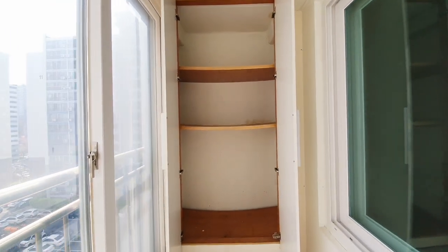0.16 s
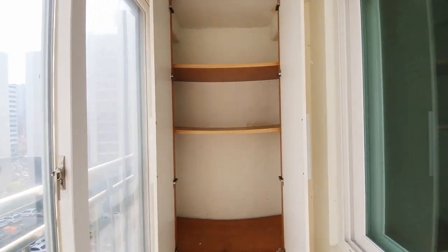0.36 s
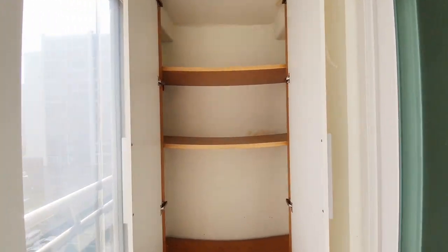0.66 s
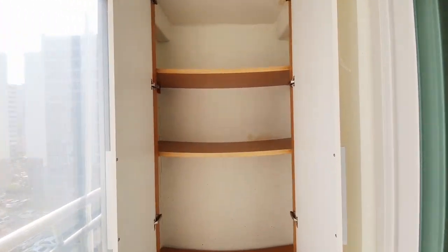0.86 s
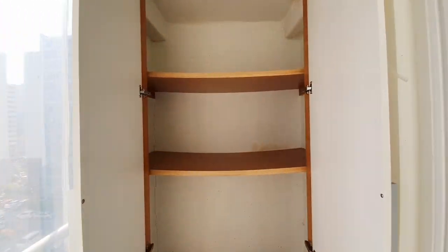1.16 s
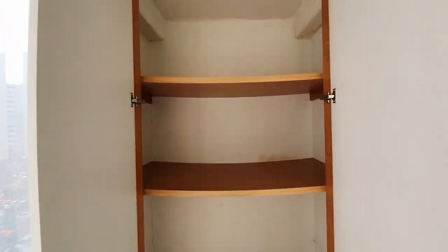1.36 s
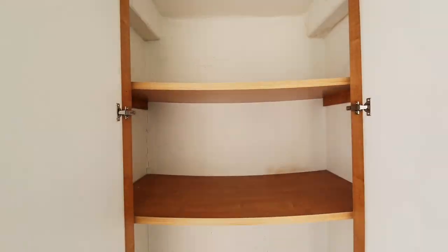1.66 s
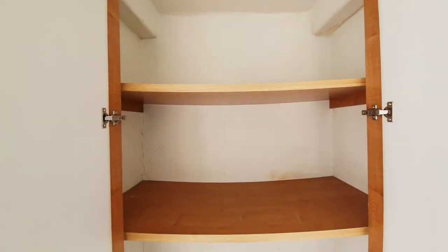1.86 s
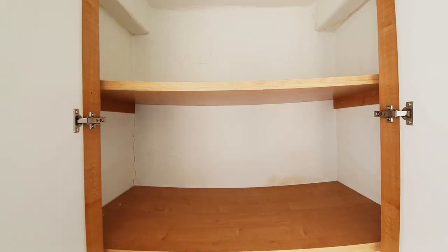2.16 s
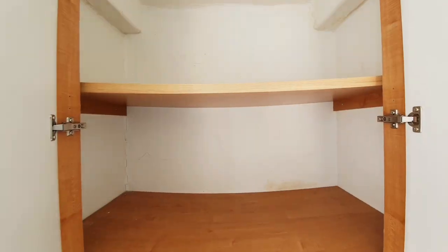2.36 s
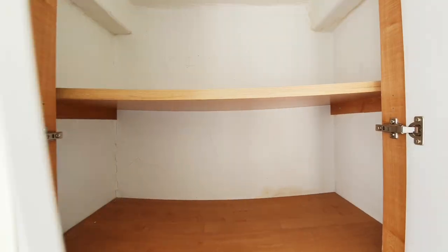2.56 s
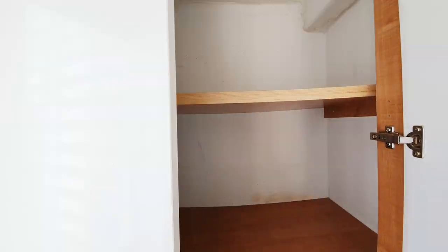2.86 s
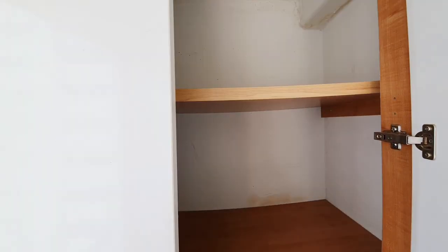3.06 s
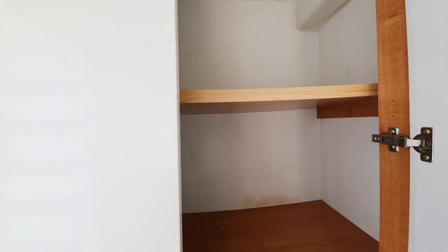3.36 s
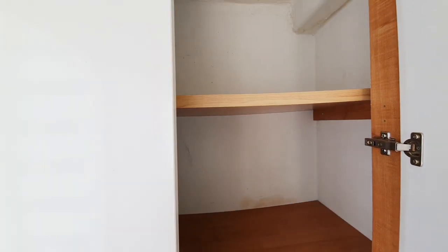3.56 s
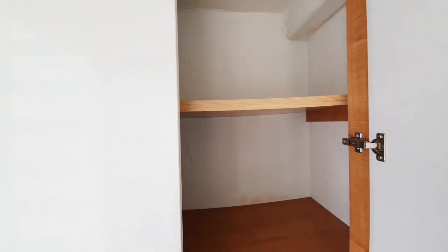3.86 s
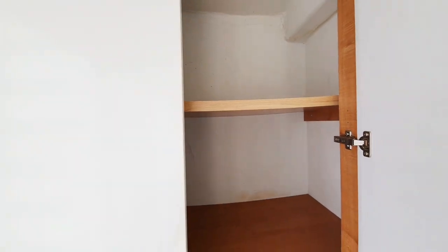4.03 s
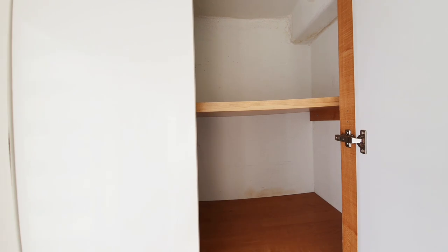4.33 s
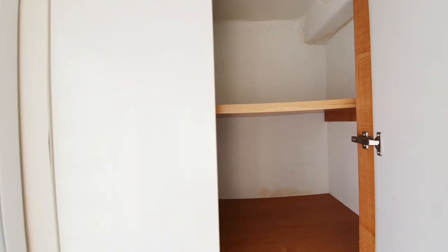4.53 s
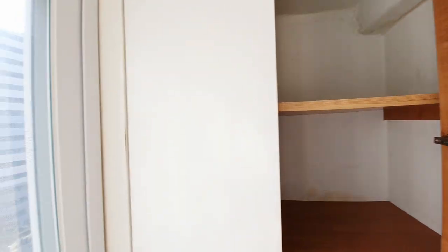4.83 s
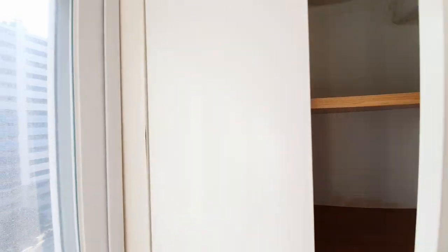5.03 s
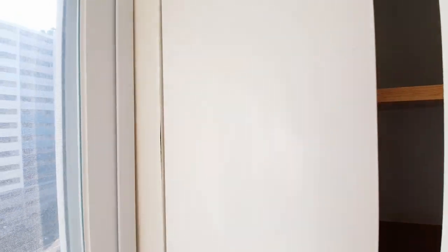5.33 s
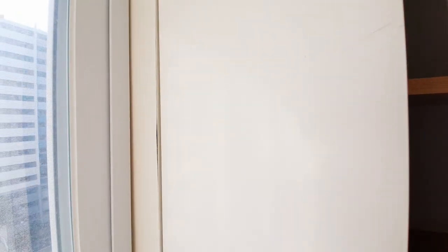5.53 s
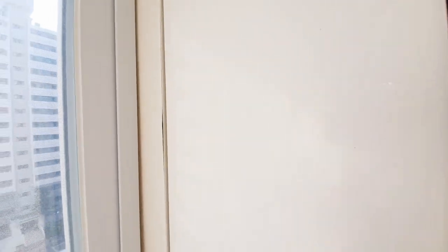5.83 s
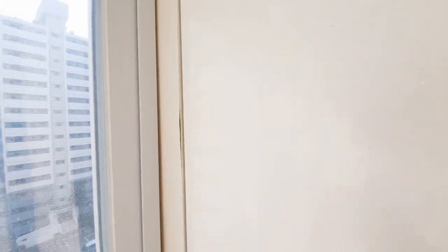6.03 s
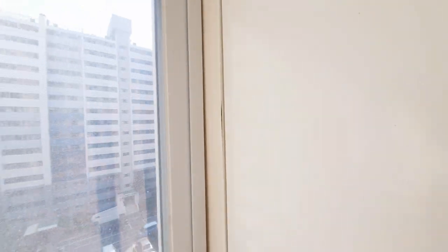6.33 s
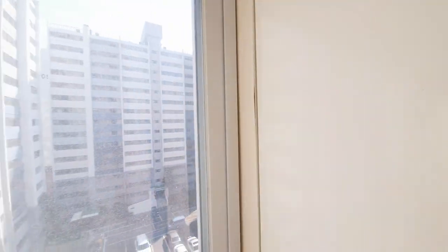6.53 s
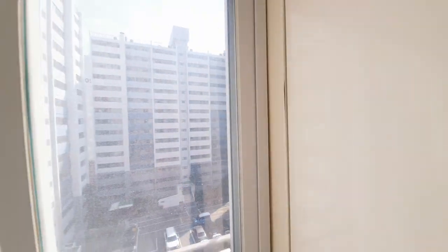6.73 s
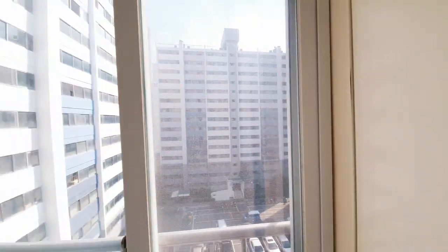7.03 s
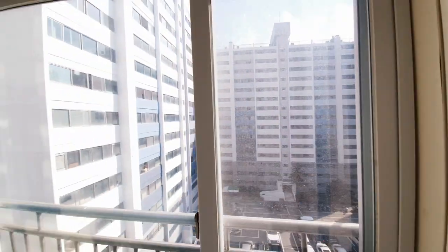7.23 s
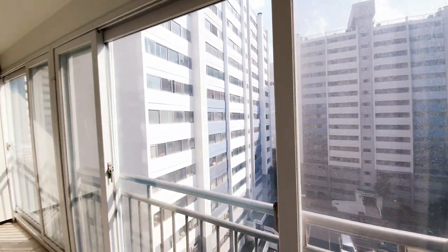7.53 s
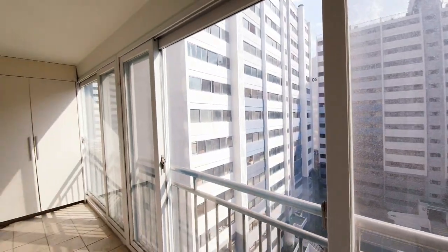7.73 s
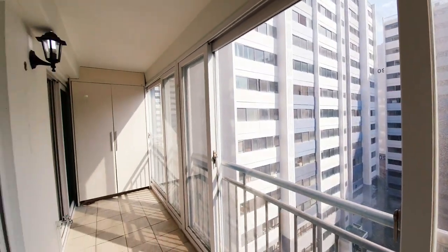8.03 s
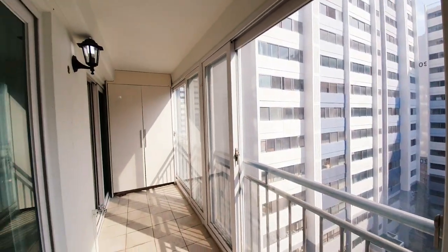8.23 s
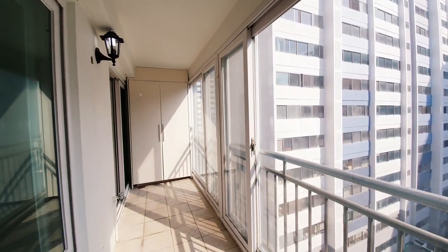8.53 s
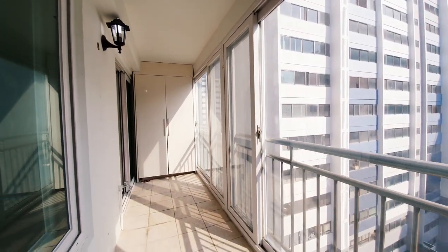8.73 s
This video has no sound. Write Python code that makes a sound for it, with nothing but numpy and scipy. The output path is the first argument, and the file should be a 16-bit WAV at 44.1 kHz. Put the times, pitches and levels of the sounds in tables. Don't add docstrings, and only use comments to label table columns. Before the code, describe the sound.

Close hollow thuds and hinge clicks of cupboard doors being closed in an empty echoing balcony, with soft fabric rustle and a faint city hum.

```python
import sys
import numpy as np
from scipy import signal
from scipy.fft import rfft, irfft, next_fast_len
from scipy.io import wavfile
from scipy.ndimage import map_coordinates

SR = 44100
rng = np.random.default_rng(int(sys.argv[2]) if len(sys.argv) > 2 else 0)


def output_pcm(signal):
    pcm = np.clip(np.atleast_2d(signal).T, -1, 1) * 32767
    wavfile.write(sys.argv[1], SR, np.round(pcm).astype(np.int16))


def linear_from_db(decibels):
    return 10 ** (np.asarray(decibels, float) / 20)


N = 392049

# t/s, peak level/dB, centre f/Hz, room share/dB
THUDS = [ (.212, -44.5, 165, -5), (2.66, -43.5, 75, -2), (2.93, -42, 70, -16), (3.232, -38, 95, -1),
         (3.278, -15.5, 118, -16), (3.028, -40, 58, -22), (3.333, -25, 160, -14), (3.418, -25, 130, -14),
         (5.128, -23.5, 130, -13), (5.165, -24.5, 140, -13), (8.275, -40, 60, -12),
         (3.903, -47.5, 258, -7.5), (4.033, -39, 200, -2), (5.055, -31, 145, 3), (5.737, -45, 280, -2),
         (6.105, -36, 260, 4), (6.640, -33.5, 192, -2.5), (7.93, -56, 100, 6), (8.086, -35, 140, -10),
         (8.130, -32, 140, -6), ]
PANEL_KNOCKS = [ (1.196, -35.5, 400, -8), (1.27, -44, 330, -1.5), (3.107, -47, 400, -2),
                (3.125, -48, 500, -6), (4.032, -49, 620, 0), (5.055, -38, 480, -1),
                (6.096, -32.5, 760, 2.5), (6.431, -43, 590, -9), (6.638, -39, 680, -6),
                (8.08, -51, 430, -8), (8.126, -45, 420, -4), (8.157, -44, 480, -12), (.47, -60, 520, -4), ]
SLAPS = [(2.642, -46, 520, -3.5), (3.015, -40, 520, -4), (3.262, -27, 380, -5), (5.62, -47, 600, -9)]
RAPS = [ (.862, -51, 1700, -1.5), (1.199, -56, 1000, 1.5), (2.181, -39, 2300, -8.5), (2.618, -64, 1050, 11),
        (3.021, -52, 700, 4), (3.263, -25.5, 1500, -13), (4.029, -52, 1450, -1.5), (5.054, -46, 1150, 2),
        (5.068, -43, 2200, -4), (6.094, -27, 1750, -13), (6.098, -39, 1220, 3.5), (6.155, -43, 1400, 0),
        (6.225, -48, 1250, 0), (3.275, -35, 1500, -9), (6.431, -53, 1180, -4), (6.637, -38.5, 1150, -10),
        (8.08, -57, 1700, -12), (8.089, -57, 1700, -13), (8.128, -58, 1600, -14), ]
HINGE_CLICKS = [ (.19, -59, 6350, -1.5), (.864, -51.5, 3800, -2), (2.182, -35, 3600, -11),
                (2.484, -53, 2300, -4), (2.641, -46, 4260, -14), (2.769, -43, 3600, -8),
                (3.022, -54, 5900, 1.5), (3.263, -40, 3600, -4), (3.3, -35.5, 5800, -14),
                (5.0545, -52, 4200, 1), (5.624, -49, 8000, 0.1), (6.0935, -38, 3300, -17),
                (8.1813, -55, 3800, -11), ]
STEEL_TICKS = [ (3.03, -51, 13400, -1.5), (3.2858, -26, 13800, -15), (3.2925, -32, 14200, -16),
               (3.3012, -27, 7800, -17), (3.472, -54, 12500, -5), (3.495, -56, 14000, -8), ]
SNAP = [(2.1813, -32, 3600, -30)]
CATCH = [(6.0942, -14.5, 1300, -24)]
# crack t60/s, room build-up/s, rise/cycles
WOOD = (.054, .0072, .61)
EDGE = (.03, .0035, 1.3)
STEEL = (.0094, .0055, 6.7)
# t/s, left lag/ms
BEARING = [(1.2, .13), (2.18, -.15), (3.12, .15), (3.26, .4), (3.295, .01), (3.31, .01), (4.03, .25),
           (5.06, .24), (5.7, .01), (6.1, -.39), (6.43, .2), (8.1, -.05)]

FIRST_CLOSING = [ ((.864, -66, .004), [(1250, -2, .35), (1720, 0, .25), (1900, -2, .3), (2650, -4, .25),
                 (3030, -1, .25), (3520, -5, .25)]), ((1.197, -45, 0.0035), [(182, -3, 0.4), (380, -11, 0.71),
                 (418, -9.5, .5), (470, -2, 0.35), (600, -4, 0.3)]), ((1.30, -48.5, 0.023), [(304, 2, 0.66)]),
                 ((2.182, -49, 0.0012), [(2020, 1, .2), (2490, -5, .2), (2730, -5, .3), (3165, -5, .3),
                 (3550, -4, .33), (3900, -2, .15), (5200, -6, .35), (5550, -6, .3)]), ((1.99, -51, .006),
                 [(212, 0, .35)]), ((2.121, -41, .004), [(210, 0, .4)]), ((2.2, -50, .015), [(215, 0, .3)]),
                 ((3.27, -43, .006), [(447, -4, .6), (560, 0, .46), (775, -4, .6), (894, -8, .55),
                 (1044, -5, .35), (1120, -3, .36), (1206, -6, .25), (1357, -8, .25)]), ((3.279, -24.5, 0.0041),
                 [(62.2, -12, 0.64), (107.6, .5, 0.8), (146.4, -2.5, 0.85), (195, -6, .6), (259.6, -6, .65),
                 (295, -8, .5), (362, -16.5, 0.69), (630, -20, 0.61)]), ((4.037, -33, 0.022), [(70, 1.5, 0.56),
                 (95, 1, 0.43), (138.8, -3, 0.7), (246, -13, 0.24), (334, -20, 0.4), (388, -14, .27),
                 (554, -14, .31), (624, -11, .22), (727, -26, .5)]), ((4.36, -37, 0.018), [(70, 4, 0.56),
                 (100, -4, .5), (144, -5, 0.6)]), ((4.715, -39, .008), [(47.6, 1, 0.42), (75, -5, .3)]), ]
SECOND_DOOR = [ ((5.058, -18, 0.048), [(63.5, -1, 0.87), (118.4, -1, 0.72), (221.4, -15, 1.0),
               (256.4, -9, 0.6), (414, -12.5, 0.28)]), ((6.100, -26.5, 0.041), [(59.4, -2, 0.76),
               (83.4, -1, 0.85), (142, -.5, 0.72), (196, -3, 0.55), (258.7, -12, 0.89), (300, -12, 0.72),
               (432, -13, 0.45), (680, -18, 0.8)]), ((6.097, -40, .006), [(678, -2, .4), (894, -4, .42),
               (1114, -3, .4), (1200, -6, .56), (1330, -8, .6), (1389, -9, .37), (1540, -7, .35),
               (1744, -8, .41), (1868, -6, .36), (1949, -5, .33), (2250, -8, .33), (2595, -13, .33)]),
               ((6.640, -36.5, 0.025), [(49.4, -6, 0.35), (88.8, -3, 0.41), (257, -1.5, 0.3),
               (354, -13, 0.8)]), ((8.082, -34, 0.039), [(44.5, 1, 0.74), (85.4, -6.5, 0.9),
               (141.1, 0.5, 0.55), (216, -14, 0.6), (297, -14, .5), (345, -12, 0.74)]), ((8.128, -40, .008),
               [(140, -4, .5), (221, 2, .4), (345, -3, .42), (479, -14, .6), (522, -16, .5),
               (565, -15, .55), (646, -18, .4)]), ]
FIRST_TOUCHES = [ ((3.105, -37, .003), [(280, 0, .08), (560, -8, .1)]), ((3.127, -36, .003), [(300, 0, .08),
                 (220, -3, .12), (850, -14, .15)]), ((3.262, -37, .003), [(640, -4, .15), (900, 0, .12),
                 (1300, -2, .12), (1720, -2, .13), (2050, 3, .07), (2400, -6, .15)]), ((4.029, -53, .003),
                 [(690, 0, .3), (1150, -4, .2), (1420, -1, .15), (1750, -6, .2), (2250, -9, .2)]),
                 ((6.0945, -31, .002), [(430, 0, .06), (700, 3, .12), (1200, -3, .08), (1850, 4, .06)]),
                 ((6.094, -31, .003), [(65, -3, .15), (110, -4, .2), (155, 2, .1), (215, 2, .08)]),
                 ((8.078, -38, .004), [(60, 0, .15), (105, -2, .12), (150, 0, .12)]), ((3.266, -34, .002),
                 [(2060, 0, .05), (215, 7, .15), (270, 5, .15)]), ((3.232, -37, .003), [(215, 0, .1),
                 (290, -5, .08)]), ((5.066, -47, .002), [(1950, 0, .1), (2350, 0, .12), (600, 4, .4)]),
                 ((5.62, -52, .01), [(105, 0, .5), (150, -3, .4)]), ]

# start t/s, end t/s, first f/Hz, level/dB
SQUEAKS = [ (.25, .42, 285, -66), (.6, .8, 290, -66), (.6, .95, 1270, -79), (2.62, 2.74, 225, -56),
           (3.7, 3.95, 1245, -78), (4.26, 4.3, 1750, -73), (4.33, 4.36, 1740, -73),
           (4.345, 4.38, 1150, -72), (4.4, 4.42, 1200, -71), (4.78, 5.02, 1760, -80), (6.5, 6.7, 2880, -77),
           (6.8, 6.86, 4080, -70), (6.95, 7.06, 4050, -78), (6.82, 6.98, 1720, -68),
           (4.17, 4.32, 3950, -74), (4.06, 4.12, 3950, -78), (8.5, 8.75, 1225, -76), ]
RASPS = [
    (1.9, 2.01, 1710, -69),
    (4.26, 4.36, 640, -63),
    (4.68, 4.78, 1930, -78),
]
# start t/s, end t/s, first f/Hz
SQUEAL = (6.4, 7.12, 575)
# multiple of the pitch, level/dB
SQUEAL_PARTIALS = [(2, -71), (3.22, -73), (4.3, -77), (5.1, -82), (8, -89)]

# peak t/s, rise/s, fall/s, level/dB
FINE = [(2.768, .012, .04, -66), (2.15, .06, .08, -67), (2.38, .04, .06, -76), (3.49, .02, .03, -72),
        (1.3, .1, .2, -84)]
SILKY = [(.3, 0.13, 1.5, -77.5), (1.52, .03, 0.05, -73), (1.945, 0.027, .072, -67.5),
         (2.215, .022, .08, -62.5), (3.3, 0.4, 0.83, -74.5), (2.55, .1, .2, -75), (4.07, 0.047, 0.061, -69),
         (5.3, 0.31, 0.17, -75.5), (5.92, 0.051, 0.041, -57.5)]
SMOOTH = [(2.785, .012, .05, -60.5), (3.65, .013, .12, -73), (4.26, .079, 0.15, -61),
          (5.664, .031, 0.076, -51), (6.0, 0.072, 0.067, -51), (8.749, .073, 0.092, -53.5)]
PLAIN = [(.6, 0.19, 0.18, -72.5), (1.4, 0.2, 0.12, -70.5), (3.045, .02, 0.055, -60.5),
         (4.44, .063, 0.046, -63), (6.34, 0.068, .12, -58.5), (6.84, .079, .11, -58.5),
         (6.99, .088, .083, -59.5), (8.37, .077, .11, -52.5)]
COARSE = [(2.39, .04, 0.09, -73), (2.64, 0.04, .13, -66.5), (2.97, .03, .04, -73), (3.13, .05, .06, -76),
          (2.23, .05, .07, -70), (3.25, .025, .02, -66), (2.92, .05, .04, -78), (4.8, .16, 0.31, -83),
          (6.6, 0.19, .17, -75), (7.15, 0.12, 0.13, -79), (8.6, 0.13, 0.11, -76.5)]
# fine weave level/dB, coarse scuff level/dB
BLEND = [
    (6, -12),
    (-1.5, -0.5),
    (-7.5, -6),
    (-6.5, 0.4),
    (-6.5, 8.5),
]
# f/Hz, level per Hz/dB
CLOTH = [(1290, -24), (2200, -7.5), (2490, -7.5), (3170, -1.5), (6300, -3.5), (8020, -2.5), (9470, -15.5),
         (11500, -18.5), (15000, -44), (22000, -120)]
WEAVE = [(6180, -21), (10500, -0.5), (12600, 5), (15100, 3.5), (16000, -23.5)]
SCUFF = [(350, -37), (600, -8.5), (901, -6), (1320, -6), (1970, -6), (3200, -15.5), (4160, -20),
         (7040, -120)]
AIR = [(8.8, -30), (18, -2), (30, 6), (70, -4), (91, -25.5), (150, -120)]
FLOORBOARD = [(26, -34), (45, -7), (103, 0), (141, -8.5), (190, -30), (250, -48), (420, -120)]
FRAME = [(82, -38.5), (140, -1), (167, -1.5), (241, -5.5), (280, 2.5), (322, -9), (900, -18), (1170, -63),
         (1980, -120)]
HUM = [(12, -30), (25, 5), (36, -2), (193, -18.5), (248, -14), (328, -18.5), (377, -14.5), (1000, -25),
       (1330, -25.5), (1700, -26), (7950, -41), (9140, -52.5), (14700, -35.5), (16000, -41)]

# t/s, effort level/dB
EFFORT = [(0, -69.5), (.6, -66.5), (1.15, -69), (1.7, -76), (2.05, -62), (2.5, -66.5), (2.9, -64.5),
          (3.21, -55.5), (3.55, -62), (4.9, -68), (5.65, -65.5), (5.95, -69), (7.2, -65.5), (7.7, -68),
          (8.03, -64), (8.89, -68)]
# t/s, air level/dB, footfall level/dB, creak level/dB
SHUDDERS = [(1.3, -66, -68, -60), (3.28, -41.5, -45, -51.5), (4.07, -45.5, -47, -61), (4.4, -55, -48, -61),
            (5.09, -38.5, -43, -51), (5.45, -72, -55, -66), (6.12, -41.5, -40.5, -42.5),
            (6.64, -46, -53, -64), (8.07, -40.5, -52, -61), (8.46, -68, -72, -63)]
# t/s, level/dB, left-right level/dB
PUFFS = [(1.13, -61, -2), (1.6, -52, .1), (2.69, -54, -12), (3.04, -52, -20.5), (3.21, -53, 8),
         (3.8, -53.5, 10), (4.8, -49, -16), (6.08, -54, -3), (7.7, -59.5, -.6), (7.95, -57, 1.2)]

# f/Hz, t60/s
ROOM = [(60, 0.84), (250, 0.61), (600, 0.5), (1500, 0.39), (4000, 0.31), (12000, 0.21)]
# f/Hz, left-right correlation
ALIKE = [(60, 0.87), (150, 0.82), (380, 0.74), (950, -0.13), (2380, 0.029), (15000, 0.029)]
# f/Hz, level/dB
MICROPHONE = [(6500, 0), (8000, .7), (9000, -1.5), (11300, -1.2), (12300, 0)]


def unit(x):
    return x / np.sqrt(np.mean(x ** 2) + 1e-20)


def along(points, hz):
    f, v = np.transpose(points)
    return np.interp(np.log(hz + 1), np.log(f + 1), v)


def wobble(rate, size=N):
    knots = rng.standard_normal(int(size * rate / SR) + 4)
    return map_coordinates(knots, [np.arange(size) * rate / SR])


def filtered(x, response):
    m = next_fast_len(x.shape[-1] + 4096)
    return irfft(rfft(x, m) * response(np.fft.rfftfreq(m, 1 / SR)), m)[..., :x.shape[-1]]


def diffuse(pair, gain):
    peaks_db = 2.5 * rng.standard_normal(SR // 80 + 1)

    def response(hz):
        turn = np.arccos(np.clip(along(ALIKE, hz), -1, 1)) / 2
        ripple_db = np.interp(hz / 40, np.arange(len(peaks_db)), peaks_db)
        ripple = linear_from_db(ripple_db * np.clip(hz / 600 - .4, 0, 1))
        return gain(hz) * ripple * [np.cos(turn), np.sin(turn)]

    mid, side = filtered(pair, response)
    return np.array([mid + side, mid - side])


def rush(spectrum, grain_db, grain_rate):
    grains = linear_from_db(grain_db * np.array([wobble(grain_rate), wobble(grain_rate)]))
    noise = grains * rng.standard_normal((2, N))
    return unit(diffuse(noise, lambda hz: linear_from_db(along(spectrum, hz))))


def add(out, sound, s):
    part = out[:, round(s * SR):][:, :sound.shape[-1]]
    part += sound[..., :part.shape[1]]


def blow(s, centre_hz, room_db, size, octaves, crack_t60, build, rise_cycles):
    t = np.arange(size) / SR
    noise = rng.standard_normal((3, size))
    lag_ms = np.interp(s, *np.transpose(BEARING))

    def colour(hz):
        skirt = np.where(hz > centre_hz, .85, 1)
        return 1 / (1 + (np.log2((hz + 1) / centre_hz) / (max(octaves, .1) * skirt)) ** 4)

    def lag(hz):
        return np.exp(-1j * np.pi * hz * lag_ms * [[1e-3], [-1e-3]])

    attack = np.minimum(t * centre_hz / rise_cycles, 1)
    source = unit(filtered(noise[0], colour)) * linear_from_db(-60 * t / crack_t60) * attack
    crack = filtered(np.pad(1.3 * source / np.abs(source).max(), (64, 0)), lag)[:, 64:]

    clumps = linear_from_db(2.2 * np.interp(t * 45, np.arange(30), noise[0, -30:]))
    hz, when, z = signal.stft(unit(diffuse(clumps * noise[1:], colour)), SR, nperseg=512)
    decay = linear_from_db(-60 * when / along(ROOM, hz)[:, None])
    tail = signal.istft(z * decay, SR, nperseg=512)[1][:, :size]
    near_walls = .93 + .45 * np.exp(-t / .04)
    return crack + linear_from_db(room_db) * tail * near_walls * (1 - np.exp(-t / build))


def knocks(table, octaves, crack_t60, build, rise_cycles):
    out = np.zeros((2, N))
    for s, db, centre_hz, room_db in table:
        lingers = octaves > 1 or centre_hz < 1000 or db > -36
        size = SR * 5 // 8 if lingers else SR * 3 // 8
        sound = blow(s, centre_hz, room_db, size, octaves, crack_t60, build, rise_cycles)
        add(out, linear_from_db(db - 2.5) * sound, s)
    return out


def door_hits():
    wood = knocks(THUDS, .85, *WOOD) + knocks(PANEL_KNOCKS, .7, *WOOD) + knocks(SLAPS, 1.5, *WOOD)
    edges = knocks(RAPS, .72, *EDGE) + knocks(SNAP, 1.0, .006, .005, .7)
    steel = knocks(HINGE_CLICKS, .9, *STEEL) + knocks(STEEL_TICKS, .25, *STEEL)
    catch = knocks(CATCH, .22, .032, .006, 3) * linear_from_db([[-1.5], [1.5]])
    return wood + edges + steel + catch


def slams():
    out, t = np.zeros((2, N)), np.arange(SR) / SR
    for (s, db, build), modes in FIRST_CLOSING + SECOND_DOOR + FIRST_TOUCHES:
        for hz, mode_db, t60 in modes:
            beat = linear_from_db((2.4 + .0007 * hz) * wobble(12 + .03 * hz, size=SR))
            spread = rng.normal(0, 0.0006 * (hz + 450), (2, 1))
            phase = rng.uniform(0, 2 * np.pi) + spread
            drift = .7 * wobble(11 + .025 * hz, size=SR)
            ring = np.sin(2 * np.pi * hz * t + phase + drift)
            decay = linear_from_db(db + mode_db - 60 * t / min(t60, 1.1))
            add(out, decay * (1 - np.exp(-t / build)) * beat * ring, s)
    return out


def squeaks(table, width, steady=0):
    out = np.zeros((2, N))
    for start, end, first_hz, db in table:
        size = round((end - start) * SR)
        pitch = first_hz * (1 - .11 * np.arange(size) / SR)
        carrier = np.exp(2j * np.pi * np.cumsum(pitch) / SR)
        rate = width * first_hz
        shared, left, right = [wobble(rate, size) + 1j * wobble(rate, size) for _ in range(3)]
        apart = min(first_hz / 1200, 1.5) * np.array([left, right])
        swell = np.sin(np.linspace(0, np.pi, size)) ** 0.42 * linear_from_db(db)
        add(out, swell * np.real(carrier * (steady + shared + apart)), start)
    return out


def hinges():
    start, end, first_hz = SQUEAL
    squeal = [(start, end, k * first_hz, db) for k, db in SQUEAL_PARTIALS]
    return squeaks(squeal, .055, 1.2) + squeaks(SQUEAKS, .075) + squeaks(RASPS, .27)


def clothes():
    power, t = np.zeros((3, N)), np.arange(N) / SR
    for strokes, (weave_db, scuff_db) in zip([FINE, SILKY, SMOOTH, PLAIN, COARSE], BLEND):
        layers = linear_from_db(2 * np.array([[0], [weave_db], [scuff_db]]))
        for s, rise, fall, db in strokes:
            bell = np.exp(-2 * ((t - s) / np.where(t < s, rise, fall)) ** 2)
            power += linear_from_db(2 * db) * bell * layers
    keep = linear_from_db(-120 / (.35 * SR))
    power += 0.2 * signal.lfilter([1 - keep], [1, -keep], power)
    rub, weave, scuff = np.sqrt(power)
    return rub * rush(CLOTH, 1.15, 400) + weave * rush(WEAVE, 1.38, 300) + scuff * rush(SCUFF, 1.3, 150)


def movement():
    t = np.arange(N) / SR
    effort_db = np.interp(t, *np.transpose(EFFORT))
    power = linear_from_db(2 * (effort_db + np.array([[-.5], [-2], [-2.5]])))
    rise_s, fade_db_per_s = .09, 51.5
    for s, *levels_db in SHUDDERS:
        since = np.maximum(t - s, 0)
        fade = linear_from_db(-fade_db_per_s * np.maximum(since - rise_s, 0))
        swell = np.minimum(since / rise_s, 1) * fade
        power += (swell * linear_from_db(levels_db)[:, None]) ** 2
    puffs = np.zeros((2, N))
    for s, db, pan_db in PUFFS:
        sides = linear_from_db(2 * db + pan_db * np.array([[1], [-1]]))
        puffs += sides * np.exp(-2 * ((t - s) / .09) ** 2)
    air, foot, creak = np.sqrt(power[0] + puffs), np.sqrt(power[1]), np.sqrt(power[2])
    return air * rush(AIR, 2.04, 17) + foot * rush(FLOORBOARD, 2.9, 18) + creak * rush(FRAME, 3.6, 30)


def city_hum():
    return linear_from_db(-63.5) * rush(HUM, 1.13, 8.0)


def scene():
    return door_hits() + slams() + hinges() + clothes() + movement() + city_hum()


def roll_off(x):
    return signal.sosfilt(signal.butter(12, 15800, fs=SR, output="sos"), x)


def record(dry):
    mix = filtered(dry, lambda hz: linear_from_db(along(MICROPHONE, hz)))
    return roll_off(mix)


dry = scene()
out = record(dry)
output_pcm(out)
```